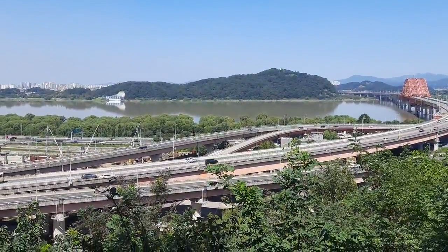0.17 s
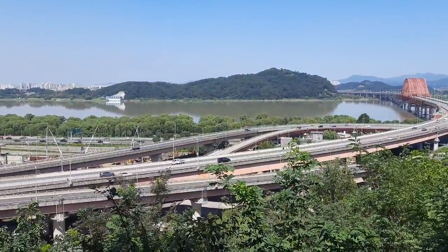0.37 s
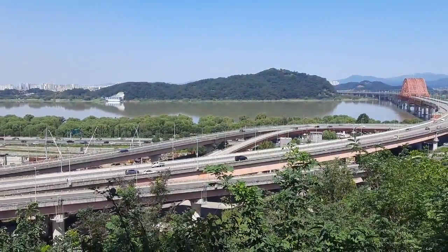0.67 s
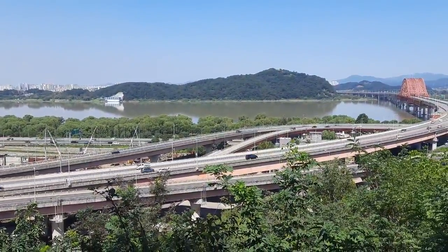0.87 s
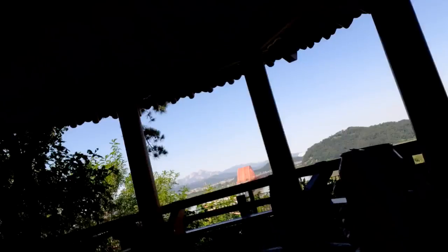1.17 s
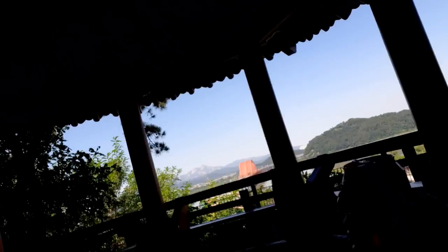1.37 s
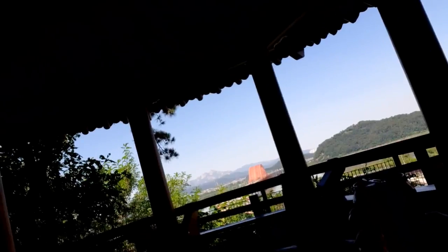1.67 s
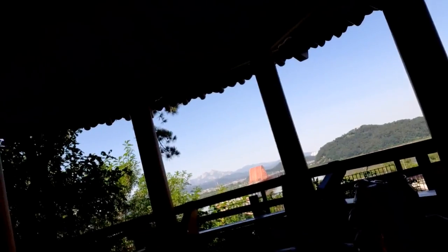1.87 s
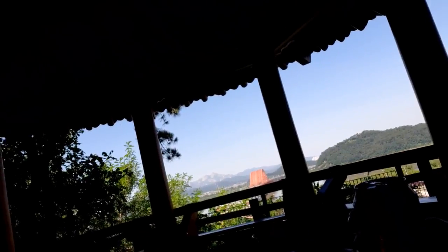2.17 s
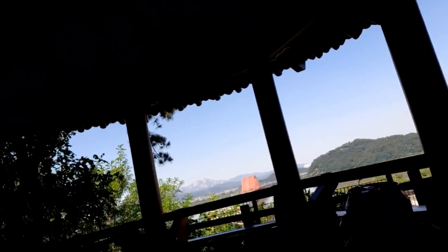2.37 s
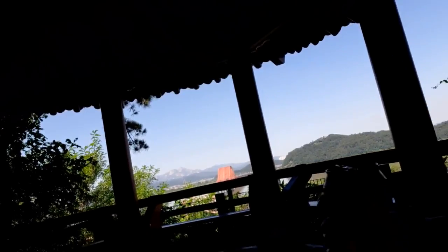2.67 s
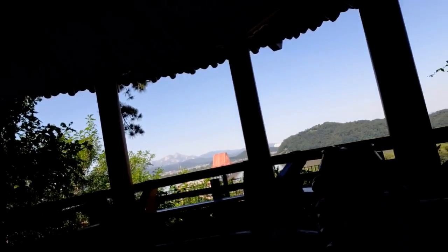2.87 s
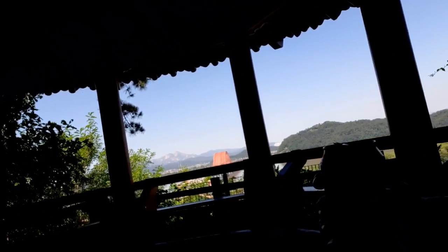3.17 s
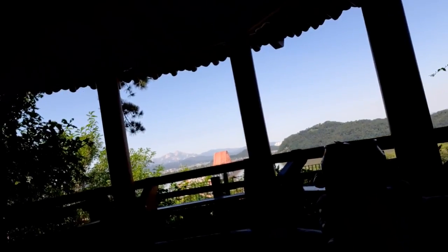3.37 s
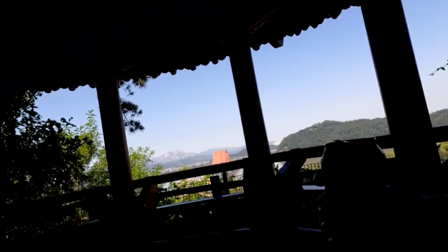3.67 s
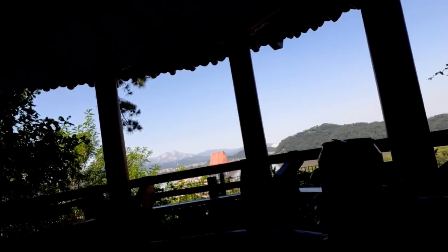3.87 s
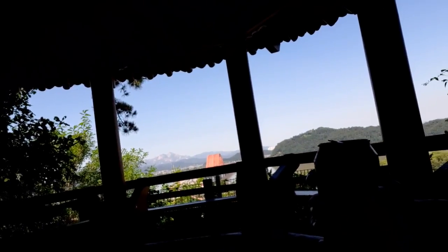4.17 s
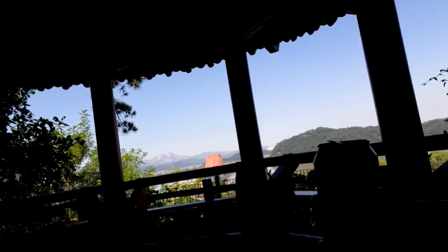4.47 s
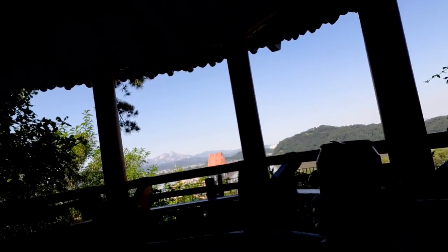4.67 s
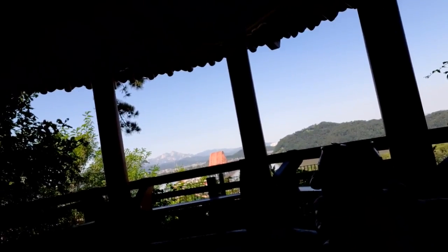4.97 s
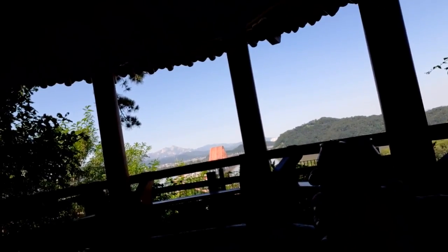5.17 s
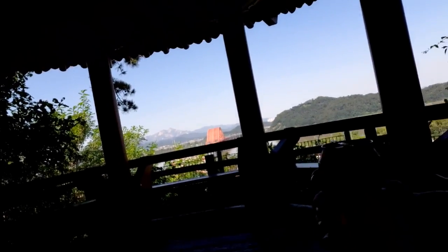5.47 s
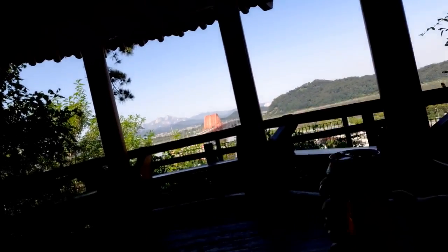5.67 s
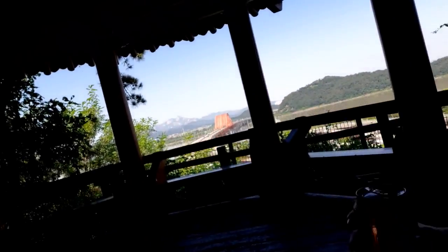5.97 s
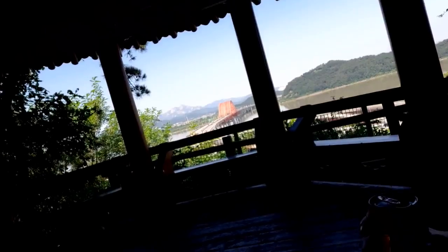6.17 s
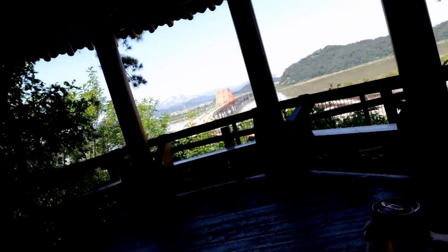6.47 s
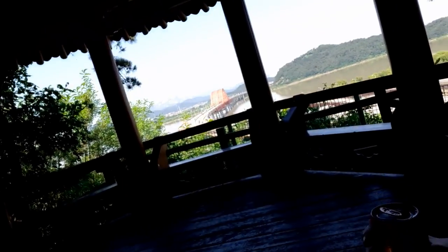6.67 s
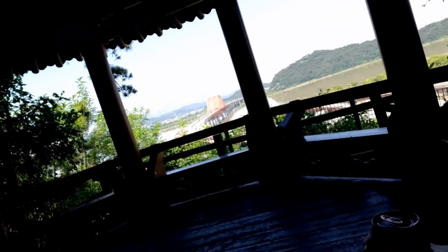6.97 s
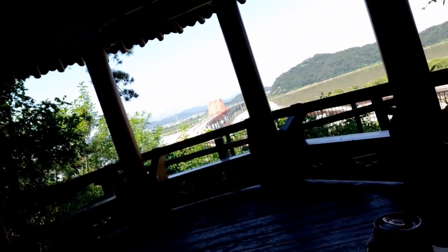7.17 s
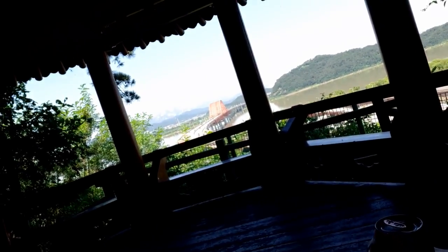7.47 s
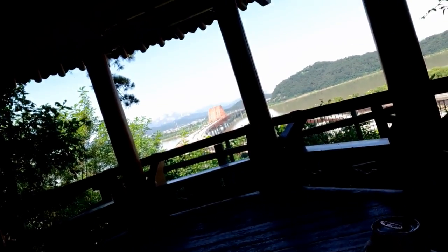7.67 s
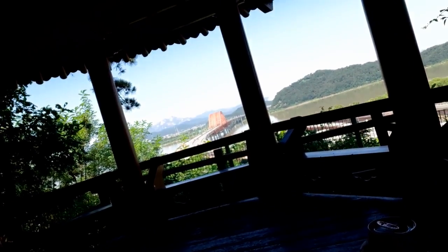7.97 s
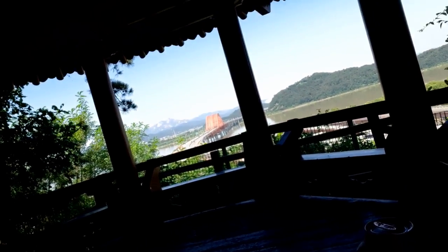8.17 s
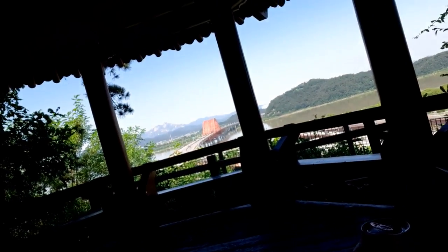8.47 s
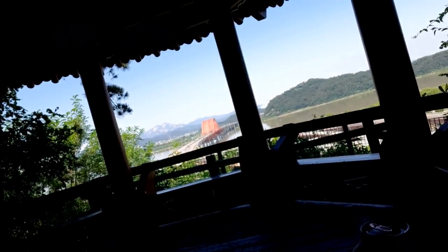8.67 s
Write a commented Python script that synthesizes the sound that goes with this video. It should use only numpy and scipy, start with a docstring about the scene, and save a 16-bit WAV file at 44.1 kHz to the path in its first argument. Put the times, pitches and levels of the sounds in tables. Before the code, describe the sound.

From 0 to 1.05 seconds, an open wooded hilltop: steady, wide motorway roar from below, low rumble and tyre wash, under a fine high insect chorus throbbing about thirty times a second. A near insect rasps at 0.17, and a bird gives a quick rising whistle at 0.7. A silent gap of under a tenth of a second follows. From 1.12, under a pavilion roof, the roar resumes with fainter chorus. A distant rock breaker knocks about five times a second from 1.3 to 6.1, dull and smeared by echoes, while a small far engine drones with wandering revs to the end, near 8.8. A high cicada pulses about four times a second; a lower one swells more slowly until about 5. Leaves rustle briefly at 5.1 and 7.2; soft hollow knocks fall at 6.3, 6.7 and 7.6, with a tiny tick at 6.5.

```python
"""Motorway roar rises to a wooded hilltop in summer: band-shaped noise for rumble, lorries and tyres.
It is heard first in the open, then, after a short silent splice, from under a pavilion roof. There a far
rock breaker knocks (echo-smeared bursts of resonant noise) and a small engine drones on two sines at changing revs.
Insects in the trees: a throbbing high chorus of noise and wing tones, and two pulsing cicadas of narrow noise.
Close to the microphone are a rasping insect, a bird's whistle, leaves, soft thuds, a faint chirp and a tick."""
import sys
import numpy as np
from scipy import signal
from scipy.fft import rfft, irfft, next_fast_len
from scipy.io import wavfile
from scipy.ndimage import uniform_filter1d, map_coordinates

SR = 44100
rng = np.random.default_rng(int(sys.argv[2]) if len(sys.argv) > 2 else 0)


def put_to_file(sound):
    """Save the sound as 16-bit audio at rate SR, in the file named by the first command-line argument."""
    columns = np.atleast_2d(sound).T  # one column per channel
    safe = np.clip(columns, -1, 1)
    whole_steps = np.round(safe * 32767)
    wavfile.write(sys.argv[1], SR, whole_steps.astype(np.int16))


N = 389403
T = np.arange(N) / SR

# Silence between the two places: start_s, end_s
SPLICE = (1.049, 1.1245)
# Traffic and chorus at each place: start_s, rumble_db, lorry_drone_db, tyre_roar_db, chorus_db
OPEN_LEVELS = [(0, -35.5, -31.5, -29, -45), (1.045, -37.5, -32.5, -28.5, -45)]
ROOF_LEVELS = [(1.13, -36.5, -32.5, -31.5, -56), (2.3, -35, -32.5, -32, -56),
               (3.7, -36.5, -32.5, -31, -55.5), (4.5, -34.5, -33, -33, -56.5),
               (5.3, -37.5, -30, -31.5, -55.5), (5.7, -33, -35, -32.5, -56.5),
               (6.4, -35, -34, -31.5, -55.5), (6.9, -35, -36, -32, -55.5), (7.3, -35.5, -33, -31, -55.5),
               (8.4, -35.5, -35.5, -33, -56), (8.83, -36.5, -32.5, -30.5, -56)]
# Spectra of the traffic, the open roar notched by the echo off the slope: pitch_hz, relative level_db (per Hz)
RUMBLE_SPECTRUM = [(20, -52), (30, -41), (50, -6.5), (70, -4), (110, -4), (160, -7), (230, -21.5),
                   (300, -50)]
LORRY_SPECTRUM = [(120, -25.5), (200, -1), (300, -0.5), (400, -3), (500, -5.5), (650, -42)]
OPEN_ROAR_SPECTRUM = [(350, -21), (526, -15), (616, -5), (773, -3), (904, -2), (1120, -13.5), (1430, -8),
                      (1790, -15.5), (2090, -16), (2740, -21.5), (4200, -30), (5000, -29), (6000, -37.5),
                      (8600, -44.5), (8900, -74)]
ROOF_ROAR_SPECTRUM = [(350, -25.5), (490, -6), (560, -6), (885, -5), (1250, -9), (2130, -15), (2600, -20),
                      (3150, -28), (4130, -34), (5800, -43.5), (8600, -53), (8900, -88.5)]
# Likeness of the left and right microphone ports: pitch_hz, likeness (correlation, 0 to 1)
OPEN_LIKENESS = [(60, 1), (180, 0.94), (310, 0.91), (530, 0.6), (920, 0.38), (1600, 0.093), (5000, 0.12)]
ROOF_LIKENESS = [(60, 0.99), (180, 0.88), (310, 0.89), (530, 0.39), (920, 0.34), (1600, 0.11),
                 (5000, 0.073)]
# Lean between the ports: pitch_hz, left_minus_right_db
OPEN_LEAN = [(60, 1.5), (160, 1.0), (430, 1.0), (1140, 0.5), (3050, 0.5), (8140, -6.5)]
ROOF_LEAN = [(60, 1.0), (120, 1.5), (240, 0.5), (490, 2.5), (990, 0.5), (2000, -3.5), (4040, -2.5),
             (8140, 5.5)]
# Spectra of the insect chorus: pitch_hz, relative level_db (per Hz)
OPEN_CHORUS_SPECTRUM = [(5500, -34.5), (6300, -13.5), (6800, -10), (7150, -2.5), (7410, -4.5), (8100, -9),
                        (8300, -25.5), (8850, -23), (9000, -43)]
ROOF_CHORUS_SPECTRUM = [(5500, -33.5), (6300, -16.5), (7310, -2.5), (7790, 0), (8240, -4), (8400, -27.5),
                        (8650, -8), (8850, -41)]
# Wing tones of the nearest singer, in the order a stroke sounds them: pitch_hz, relative level_db
KATYDID_TONES = [(7650, -3), (7400, 0), (7150, 0), (6900, -9)]
# Microphone noise: pitch_hz, relative level_db (per Hz)
HISS_SPECTRUM = [(8800, -32.5), (9500, -31), (11000, -14.5), (12000, -5), (15000, -1), (16000, -9.5)]
# Wing tone of the near insect, ahead of the tree echoes: start_s, pitch_hz, level_db
NEAR_INSECT_TONE = [(.12, 3600, -80), (.132, 4000, -52), (.15, 5050, -53), (.168, 5250, -50),
                    (.185, 4850, -52), (.205, 4800, -50), (.222, 4950, -80)]
# Rasps of the near insect: centre_s, length_s, level_db
RASPS = [(.175, 0.11, -48), (.35, .04, -69)]
# Spectrum of its wings: pitch_hz, relative level_db (per Hz)
WING_SPECTRUM = [(3000, -9), (4500, -4), (5200, -2), (5600, -8), (8500, -9), (9500, -14), (15500, -19)]
# A bird's rising whistle, ahead of the tree echoes: start_s, pitch_hz, level_db, octave_db
BIRD_WHISTLE = [(.69, 3550, -80, -100), (.703, 3720, -52, -95), (.727, 4200, -46, -95),
                (.737, 4450, -53, -95), (.748, 4800, -50.5, -95), (.772, 5150, -52, -75),
                (.80, 5550, -61, -71), (.85, 5650, -67, -75), (.88, 5600, -80, -100)]
# The far engine, ahead of the port losses: start_s, firing_rate_hz, firing_tone_db, second_order_db
ENGINE_REVS = [(1.13, 143, -44, -46), (1.28, 141, -37, -47), (1.45, 138, -30.5, -44), (1.56, 135, -40, -47),
               (1.63, 133, -32.5, -44), (1.71, 128, -41, -46), (1.8, 114, -42, -36), (1.88, 113, -35, -34),
               (1.97, 112, -36, -42), (2.1, 111, -30.5, -29.5), (2.17, 109, -34, -45),
               (2.25, 106, -33, -30), (2.34, 104, -43, -41), (2.47, 104, -37, -44), (2.55, 106, -32, -33),
               (2.7, 111, -27, -43), (2.85, 119, -30, -44), (2.95, 124, -40, -46), (3.08, 126, -33, -42),
               (3.2, 124, -30.5, -42), (3.42, 119, -35, -47), (3.7, 119, -28, -46), (3.86, 121, -29.5, -44),
               (4.0, 126, -35, -47), (4.15, 124, -33.5, -42), (4.27, 122, -42, -42),
               (4.38, 122, -31.5, -42), (4.46, 125, -38, -42), (4.54, 127, -32.5, -43),
               (4.66, 125, -40, -39), (4.79, 124, -31, -39), (4.9, 124, -39, -40), (5.0, 125, -32, -39),
               (5.1, 124, -34, -42), (5.2, 117, -34, -43), (5.35, 116, -34, -43), (5.41, 106, -46, -43),
               (5.48, 98, -34, -37), (5.65, 98, -33, -38), (5.88, 100, -35, -37), (5.94, 112, -40, -44),
               (6.0, 119, -30, -43), (6.14, 118, -31, -43), (6.27, 122, -42, -52), (6.35, 131, -42, -36),
               (6.44, 129, -38, -41), (6.62, 127, -43, -48), (6.73, 124, -28.5, -46),
               (6.9, 118, -33.5, -45), (7.08, 106, -32, -43), (7.16, 103, -41, -37), (7.32, 101, -42, -42),
               (7.5, 99, -41, -46), (7.85, 102, -41, -41), (7.95, 105, -33.5, -37), (8.1, 110, -29, -40),
               (8.2, 117, -31, -47), (8.45, 117, -29.5, -46), (8.83, 116, -32, -45)]
# Swells of the two cicadas, ahead of the pan: peak_s, level_db, pitch_hz
HIGH_CICADA_SWELLS = [(1.29, -56, 5030), (1.46, -59.5, 4850), (1.74, -57.5, 4884), (1.98, -58.5, 4960),
                      (2.22, -55.5, 5000), (2.4, -56.5, 4900), (2.52, -59, 4820), (2.64, -56.5, 4900),
                      (2.87, -55, 4920), (3.1, -57.5, 4930), (3.33, -56.5, 4920), (3.57, -56, 4916),
                      (3.81, -55.5, 4900), (4.04, -57, 4880), (4.27, -54.5, 4920), (4.5, -55, 4890),
                      (4.72, -55.5, 4900), (4.96, -57, 4930), (5.2, -57.5, 4900), (5.41, -58, 4900),
                      (5.54, -61, 5050), (5.65, -55.5, 4950), (5.95, -59.5, 4885), (6.32, -59.5, 5030),
                      (6.5, -60.5, 5000), (6.8, -58.5, 4850), (6.92, -60, 4780), (7.03, -59, 4900),
                      (7.24, -59, 4950), (7.46, -57, 4980), (7.7, -58.5, 4950), (7.94, -60.5, 4950),
                      (8.15, -58, 4950), (8.22, -55.5, 4800), (8.38, -56, 4885), (8.62, -55.5, 4900)]
LOW_CICADA_SWELLS = [(1.38, -62, 3650), (1.75, -59, 3705), (2.12, -55, 3760), (2.51, -56.5, 3725),
                     (3.45, -63, 3590), (3.86, -59.5, 3640), (4.28, -60, 3520), (4.7, -61, 3630),
                     (5.12, -56.5, 3690)]
# Force of the breaker's blows, ahead of a common lift: start_s, level_db, arm_ring_over_crash_db
BLOW_FORCE = [(1.32, -33, 1), (2.28, -31.5, 0), (2.66, -29, -4), (3.25, -29.5, -6), (3.44, -27, -7),
              (4.01, -28.5, -6), (4.38, -32, -4), (4.6, -31, -5), (5.15, -30, -5), (5.5, -34, -3),
              (6.1, -34, -4)]
# Resonances of the chisel: pitch_hz, width_hz, relative level_db
CHISEL_MODES = [(550, 300, -3), (900, 300, 0), (1250, 400, -5), (1880, 300, -10), (2600, 800, -14)]
# Ringing tones of the chisel: pitch_hz, over_crash_db
CHISEL_RING = [(830, -9), (930, -5.5)]
# A narrow hum in the traffic, ahead of the port gains: start_s, pitch_hz, level_db
HUM_TONE = [(2.2, 312, -52), (2.36, 311, -37), (2.5, 308, -52), (3.9, 308, -52), (4.05, 309, -39.5),
            (4.36, 311, -40), (4.5, 310, -50), (4.62, 310, -41), (4.9, 305, -44), (5.08, 300, -39),
            (5.25, 305, -44), (5.45, 309, -40), (5.7, 307, -43), (6, 306, -60)]
# A faint, very high insect chirp, ahead of the tree echoes: start_s, pitch_hz, level_db
HIGH_CHIRP = [(2.6, 13700, -95), (2.65, 13450, -82), (2.71, 13650, -81), (2.745, 13750, -75),
              (2.78, 13450, -77), (2.812, 13300, -74), (2.835, 13900, -95)]
# Gusts in the leaves: centre_s, length_s, level_db
LEAF_GUSTS = [(5.13, .12, -46), (7.2, .13, -44), (7.3, .09, -38)]
# Spectrum of the leaves: pitch_hz, relative level_db (per Hz)
LEAF_SPECTRUM = [(800, -24), (1400, -4), (1750, -1), (2100, -5.5), (2700, -8), (3300, -13), (4100, -15),
                 (4600, -24), (6000, -44)]
# Soft low knocks: centre_s, length_s, level_db, ring_hz
KNOCKS = [(6.3, .057, -33, 520), (6.7, .045, -34, 530), (7.6, .05, -36, 600)]
# Spectrum of the boards: pitch_hz, relative level_db (per Hz)
BOARD_SPECTRUM = [(200, -31), (300, -4), (450, -1), (520, -1), (600, -11), (800, -2), (1100, -33)]
# Finger ticks on the housing, ahead of the noise that fills them: start_s, level_db
TICKS = [(6.491, -49.5)]

# Timing of the blows; each gap is shorter than the last by QUICKEN_S
FIRST_BLOW_S, BLOW_GAP_S, QUICKEN_S, BLOWS_END_S = 1.32, .1935, .0002, 6.1
ARM_RING_HZ = 408  # low ring of the breaker's arm
TOP_HZ = 15720  # upper band limit


def amp(db):
    """Gain of a level in dB."""
    return 10 ** (np.asarray(db) / 20)


def unit(x):
    """x at rms 1."""
    return x / np.sqrt(np.mean(x ** 2) + 1e-20)


def along(points, hz):
    """(pitch_hz, value) points read on a log frequency axis."""
    f, v = np.transpose(points)
    return np.interp(np.log(hz + 1), np.log(f + 1), v)


def curves(rows):
    """One value per sample for each column after the time."""
    s, *columns = np.transpose(rows)
    return [np.interp(T, s, column) for column in columns]


def wobble(rate):
    """A smooth random curve with rate knots a second."""
    knots = rng.standard_normal(int(N * rate / SR) + 4)
    return map_coordinates(knots, [T * rate])


def wavering(hz, waver_hz, rate):
    """A tone whose pitch wanders at random."""
    return np.sin(2 * np.pi * np.cumsum(hz + waver_hz * wobble(rate)) / SR)


def filtered(x, response):
    """x times a complex response of frequency."""
    m = next_fast_len(N + 8192)
    return irfft(rfft(x, m) * response(np.fft.rfftfreq(m, 1 / SR)), m)[..., :N]


def shape(points):
    """Response of a (pitch_hz, level_db) spectrum, closed above its last point."""
    return lambda hz: amp(along(points, hz)) * (hz <= points[-1][0])


def modes(table):
    """Response of (pitch_hz, width_hz, level_db) resonances in alternating polarity."""
    def response(f):
        total = 0
        for k, (centre, width, db) in enumerate(table):
            damping = 1j * f * width
            total = total + (-1) ** k * amp(db) * damping / (centre * centre - f * f + damping)
        return total
    return response


def rush(colour, alike, patchy_db=0, lean=((1, 0),), lag_ms=0):
    """Stereo noise of rms 1: patches of random gain, likeness and lean by frequency, left lagging."""
    z = signal.stft(rng.standard_normal((2, N)), nperseg=512)[2]
    field = uniform_filter1d(rng.standard_normal(z.shape[1:]), size=6, axis=0)
    field = uniform_filter1d(field, size=14, axis=1)
    pair = signal.istft(z * amp(patchy_db * unit(field)), nperseg=512)[1][:, :N]

    def mid_and_side(hz):
        turn = np.arccos(np.clip(along(alike, hz), -1, 1)) / 2
        return colour(hz) * np.array([np.cos(turn), np.sin(turn)])

    sign = np.array([[1], [-1]])  # left, right

    def ports(hz):
        cycles = hz * lag_ms / 1000 * hz / (hz + 600)  # long waves bend round the housing and lag less
        return amp(sign * along(lean, hz) / 2) * np.exp(-1j * np.pi * sign * cycles)

    mid, side = filtered(pair, mid_and_side)
    return unit(filtered(mid + sign * side, ports))


def bursts(rows, envelope, lead_s):
    """The envelope laid at every (start_s, level_db) row, beginning lead_s early."""
    out = np.zeros(N + len(envelope))
    for s, db in rows:
        out[round((s - lead_s) * SR):][:len(envelope)] += amp(db) * envelope
    return out[:N]


def puffs(rows, colour, edge):
    """Short bursts of coloured noise; edge 2 swells softly, 4 is flat-topped."""
    level = sum(amp(db) * np.exp(-np.abs(2 * (T - s) / length) ** edge) for s, length, db in rows)
    return level * rush(shape(colour), [(1, 0.16)], 2.0)


def hillside(levels, roar, chorus, alike, lean, lag_ms, throb, throb_hz, katydid_db):
    """Traffic as three bands of wavering noise, and an insect chorus throbbing at its wing-stroke rate."""
    rumble_db, lorry_db, roar_db, chorus_db = curves(levels)
    air = .5 * wobble(2.86)  # turbulence on the long path makes the roar waver
    low = amp(rumble_db + 0.53 * wobble(5.0)) * rush(shape(RUMBLE_SPECTRUM), alike, 0.26, lean, lag_ms)
    drone = amp(lorry_db + air + 0.24 * wobble(8.0)) * rush(shape(LORRY_SPECTRUM), alike, 1.33, lean, lag_ms)
    tyres = amp(roar_db + air + 0.29 * wobble(18)) * rush(shape(roar), alike, 0.77, lean, lag_ms)
    beat = 2 * np.pi * throb_hz * T + 1.2
    crowd = (1 + throb * np.sin(beat)) * rush(shape(chorus), [(1, .1)], 0.49, lean)
    # each wing stroke of the nearest singer slides down through its tones
    strokes = 0
    for k, (hz, db) in enumerate(KATYDID_TONES):
        stroke = (1 + np.sin(beat - 0.6 * k)) ** 2
        strokes = strokes + stroke * amp(db + 1.2 * wobble(40)) * wavering(hz, 20, 120)
    nearest = unit(strokes) * amp([[-6.5], [1.5]])
    return low + drone + tyres + amp(chorus_db) * unit(crowd + amp(katydid_db) * nearest)


def near_insect_tone():
    """The near insect's wing tone: a sine of rising and falling pitch, roughened by fast wander."""
    hz, db = curves(NEAR_INSECT_TONE)
    return (db > -79) * amp(db) * wavering(hz, 180, 600)


def near_insect_rasps():
    """The same insect's rasping wings: flat-topped puffs of bright noise."""
    return puffs(RASPS, WING_SPECTRUM, edge=4)


def bird():
    """A rising whistle: a wandering tone and a faint octave above it."""
    hz, db, octave_db = curves(BIRD_WHISTLE)
    tone = amp(db + 2 * wobble(120)) * wavering(hz, .024 * hz, 500)
    octave = amp(octave_db) * wavering(2 * hz, 350, 700)
    return (db > -79) * (tone + octave)


def engine():
    """A far two-stroke: only its firing tone and second order carry, fluttering on the way."""
    hz, first_db, second_db = curves(ENGINE_REVS)
    turn = 2 * np.pi * np.cumsum(hz * (1 + .007 * wobble(25))) / SR
    first = amp(first_db + 1.8 * wobble(16)) * np.sin(turn)
    second = amp(second_db + 2.5 * wobble(12)) * np.sin(2 * turn)
    tone = first + second
    late = np.pad(tone, (5, 0))[:N]  # reaches the left port 5 samples later
    return np.sqrt(2) * np.array([amp(-0.4) * late, amp(-1.9) * tone])


def cicada(swells, width_hz, length_s, pan_db, drone_db, drone_width_hz):
    """A buzz of wandering pitch swells from its neighbours' broader drone; swell tops add a faint octave."""
    swell = bursts([row[:2] for row in swells], np.hanning(round(length_s * SR)), lead_s=length_s / 2)
    hz = curves(swells)[1]
    centre = hz.mean()

    def band(centre_hz, band_hz):
        """Narrow noise through two equal resonances in a row."""
        return lambda f: modes([(centre_hz, band_hz, 0)])(f) ** 2

    steady = signal.hilbert(rush(band(centre, width_hz), [(1, .15)]), next_fast_len(N))[:, :N]
    shift = np.exp(2j * np.pi * np.cumsum(hz - centre) / SR)  # moves the band along with the pitch
    buzz = swell * (steady * shift).real
    drone = amp(drone_db + .8 * wobble(3)) * rush(band(centre, drone_width_hz), [(1, .15)], 1.2)
    octave = amp(-21.0) * swell ** 2 / swell.max() * rush(band(2 * centre, width_hz), [(1, .15)])
    return (buzz + drone + octave) * amp([[pan_db / 2], [-pan_db / 2]])


def beats(times, level, scatter_db):
    """(start_s, level_db) rows: each time with the level of its moment, give or take."""
    s, db = np.transpose(level)[:2]
    return zip(times, np.interp(times, s, db) + scatter_db * rng.standard_normal(len(times)))


def breaker():
    """Far blows smeared by echoes and dulled by the air: noise in the chisel's modes, its ring and the arm's."""
    t = np.arange(SR // 4) / SR
    smear = (1 - np.exp(-t / .014)) * (amp(-60 * t / .36) + .05 * amp(-60 * t / .6))
    crash = rush(modes(CHISEL_MODES), [(400, 0.74), (1500, 0.55)], lag_ms=0.58)
    ring = 0
    for hz, db in CHISEL_RING:
        flutter_db = 1.8 * np.array([wobble(30), wobble(30)])  # separate at each port
        ring = ring + amp(db + flutter_db) * wavering(hz, 15, 40)
    # the arm's ring reaches both ports in the same polarity, a little louder on the left
    arm = amp(curves(BLOW_FORCE)[1]) * wavering(ARM_RING_HZ, 18, 30) * amp(0) * np.array([[1], [1]])
    arm = arm * amp([[1], [-1]])
    k = np.arange(round(N / SR / BLOW_GAP_S))
    times = FIRST_BLOW_S + BLOW_GAP_S * k - QUICKEN_S * k * k / 2
    rows = beats(times[times < BLOWS_END_S], BLOW_FORCE, scatter_db=0.5)
    blows = amp(2) * bursts(rows, smear, lead_s=.018) * (crash + ring + arm)
    return filtered(blows, lambda hz: 1 / (1 + (hz / 3300) ** 6))


def hum():
    """One wavering tone, nearly alike at both ports."""
    hz, db = curves(HUM_TONE)
    tone = amp(db + 1.5 * wobble(10)) * wavering(hz, 2.5, 20)
    return np.sqrt(2) * (T > HUM_TONE[0][0]) * tone * amp([[.5], [-.5]])


def high_chirp():
    """A faint insect chirp near the top of hearing: one sine of quickly wandering pitch."""
    hz, db = curves(HIGH_CHIRP)
    return (db > -94) * amp(db) * wavering(hz, 200, 500)


def among_trees(calls):
    """Calls blurred by a short decaying noise of echoes among the trees, leaning right."""
    trees = rng.standard_normal((2, 1500)) * amp(-60 * np.arange(1500) / SR / 0.07)
    trees = trees / np.linalg.norm(trees[0])
    echoes = signal.fftconvolve(calls[None], trees, axes=1)[:, :N]
    return (0.95 * calls + 0.8 * echoes) * amp([[-1.5], [1.5]])


def leaf_rustles():
    """Gusts in the leaves: soft swells of mid-band noise."""
    return puffs(LEAF_GUSTS, LEAF_SPECTRUM, edge=2)


def thuds():
    """Each knock is a puff in the boards with a short hollow ring."""
    ring = 0
    for s, length, db, hz in KNOCKS:
        ring = ring + amp(db) * np.exp(-(2 * (T - s) / length) ** 2) * np.sin(2 * np.pi * hz * T)
    return ring + puffs([row[:3] for row in KNOCKS], BOARD_SPECTRUM, edge=4)


def finger_tick():
    """A finger tick on the housing: a few milliseconds of decaying noise, brightened by differencing."""
    decay = amp(-60 * np.arange(300) / SR / .004)
    tick = bursts(TICKS, decay, lead_s=0) * rng.standard_normal(N)
    return np.diff(tick, prepend=0)


def scene():
    """The open slope until the splice, the pavilion after it, and the close sounds over both."""
    slope = hillside(OPEN_LEVELS, OPEN_ROAR_SPECTRUM, OPEN_CHORUS_SPECTRUM, OPEN_LIKENESS, OPEN_LEAN,
                     lag_ms=-0.043, throb=0.16, throb_hz=29.44, katydid_db=-2.5)
    roof = hillside(ROOF_LEVELS, ROOF_ROAR_SPECTRUM, ROOF_CHORUS_SPECTRUM, ROOF_LIKENESS, ROOF_LEAN,
                    lag_ms=0.527, throb=0.11, throb_hz=30.4, katydid_db=-17.5)
    roof = roof + engine() + breaker() + hum()
    roof = roof + cicada(HIGH_CICADA_SWELLS, width_hz=400, length_s=0.185, pan_db=-2.0,
                         drone_db=-62, drone_width_hz=600)
    roof = roof + cicada(LOW_CICADA_SWELLS, width_hz=210, length_s=0.24, pan_db=-0.5,
                         drone_db=-77, drone_width_hz=600)
    calls = among_trees(near_insect_tone() + bird() + high_chirp())
    close = calls + near_insect_rasps() + leaf_rustles() + thuds() + finger_tick()
    return np.where(T < SPLICE[1], slope, roof) + close


def record(dry):
    """Microphone hiss, the splice with its short fades, the band limit."""
    hiss = amp(np.where(T < SPLICE[1], -73, -80)) * rush(shape(HISS_SPECTRUM), [(1, .3)], 2.5)
    fade_out = np.clip((SPLICE[0] - T) / 0.0023, 0, 1)
    fade_in = np.clip((T - SPLICE[1]) / 0.0015, 0, 1)
    return filtered((fade_out + fade_in) * (dry + hiss), lambda hz: hz < TOP_HZ)


dry = scene()
out = record(dry)
put_to_file(out)
```